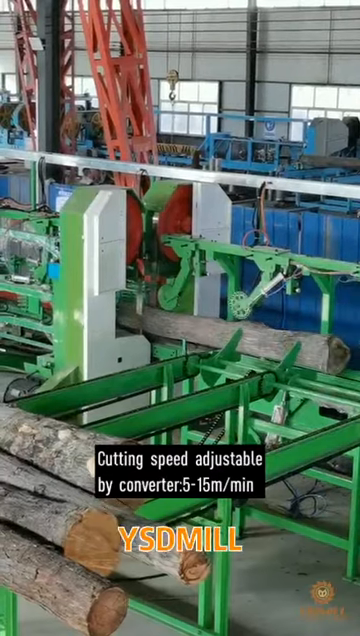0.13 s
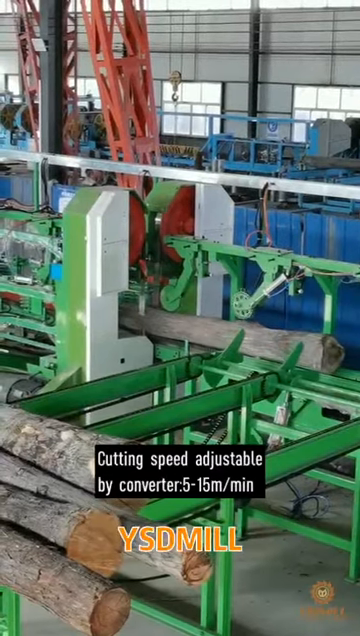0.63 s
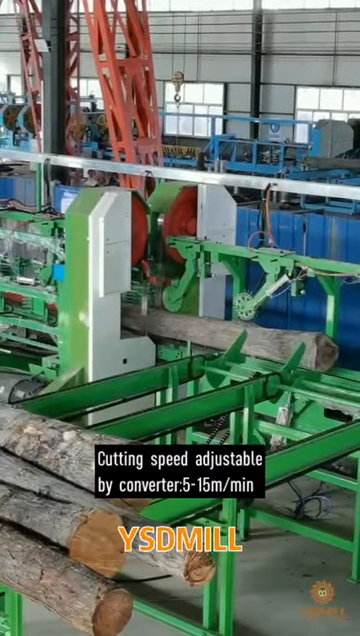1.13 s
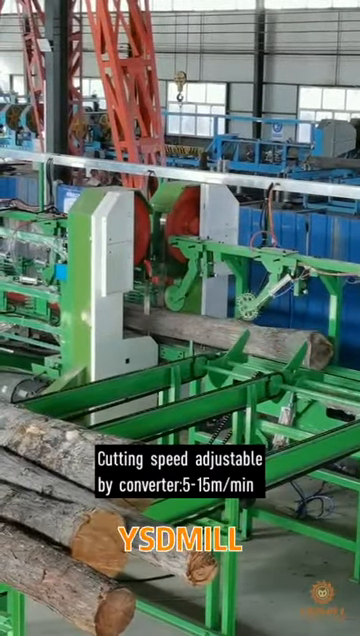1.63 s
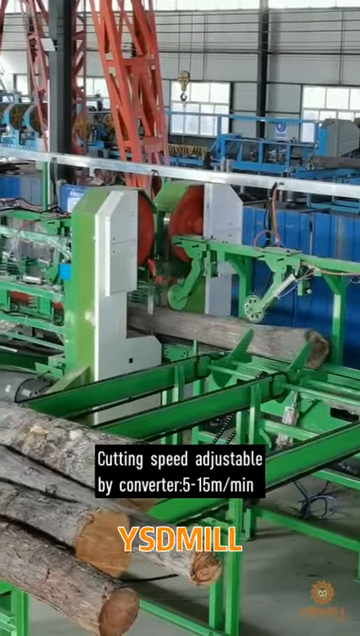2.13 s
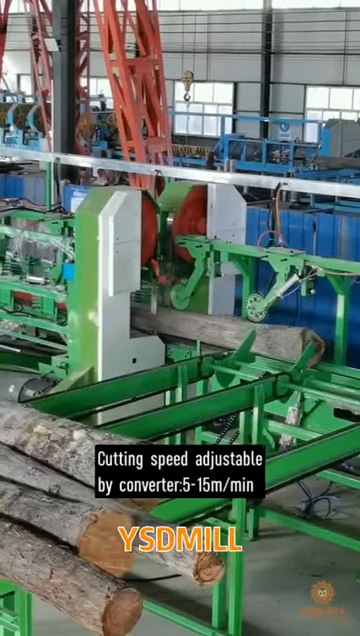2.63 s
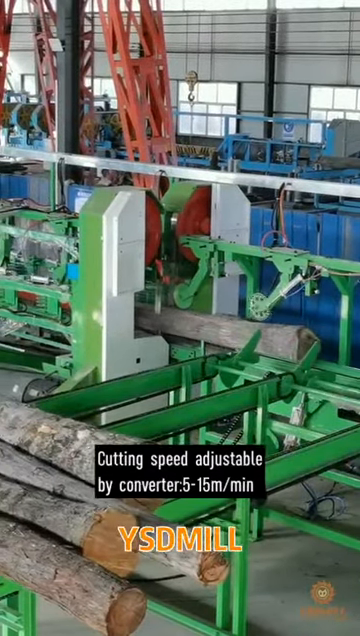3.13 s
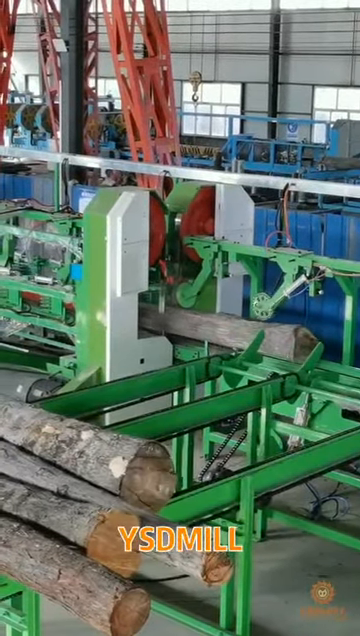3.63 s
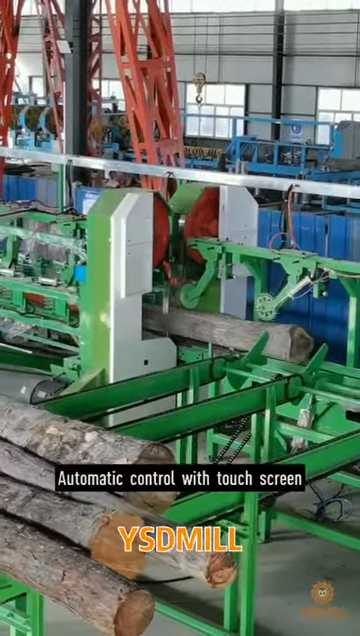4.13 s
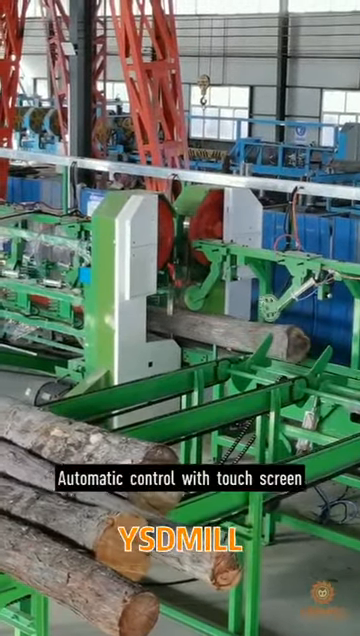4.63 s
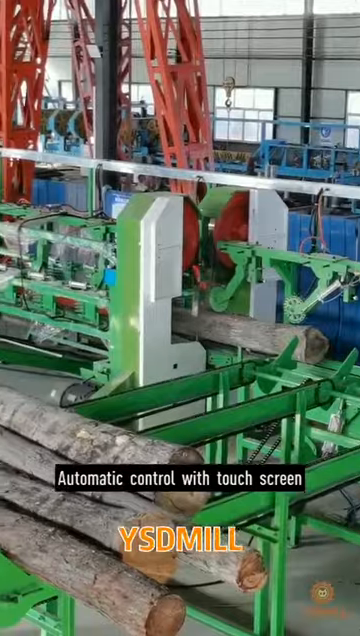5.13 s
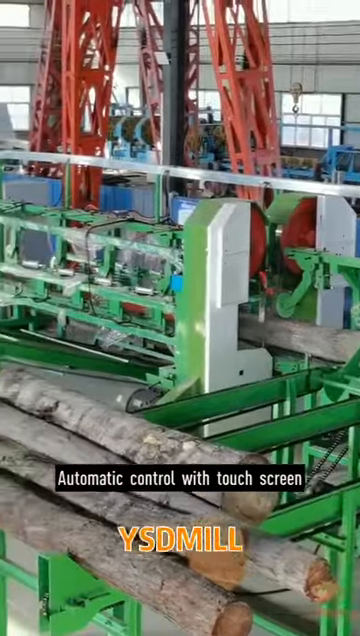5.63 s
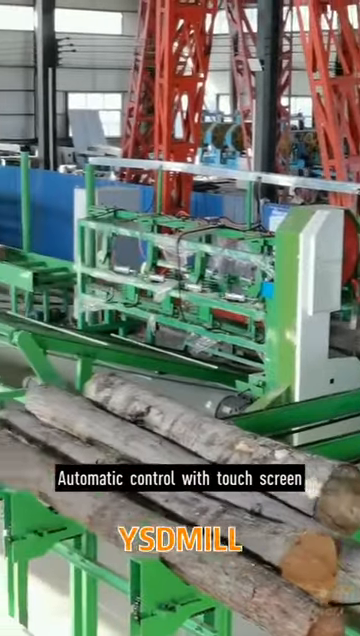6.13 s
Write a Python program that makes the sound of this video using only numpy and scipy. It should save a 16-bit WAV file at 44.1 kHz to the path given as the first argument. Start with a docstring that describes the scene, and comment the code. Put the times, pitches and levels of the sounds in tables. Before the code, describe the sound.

A steady industrial sawing noise, already running and never stopping. Two rough blade tones close in pitch beat and shimmer, with high metallic overtones buried in a dense, sizzling cutting hiss. Motors and guards drone underneath, midrange-heavy and resonant. Small surges and tiny dips ruffle the hiss, and faint tones swell briefly. The hall smears everything into diffuse, wide reverberation, picked up by a handheld stereo phone some metres away.

```python
"""In a large steel hall a twin band saw rips a log, some metres from a phone with two microphones.
Each blade sings at its own tooth rate in overtones that wander and rasp. The kerfs hiss in shaped noise
that surges and dips with the bite. Motors and frames drone as noise with narrow resonances, a few single
tones swell briefly, and the hall blends it all into a diffuse roar."""
import sys
import numpy as np
from scipy import signal
from scipy.fft import rfft, irfft, next_fast_len
from scipy.io import wavfile
from scipy.ndimage import uniform_filter1d

SR = 44100
rng = np.random.default_rng(int(sys.argv[2]) if len(sys.argv) > 2 else 0)


def volts_from_db(level):
    """Convert decibel levels to linear amplitude ratios."""
    exponent = np.asarray(level, float) / 20
    return 10 ** exponent


def transcribe(signal):
    """Save signal, clipped to [-1, 1], as a 16-bit WAV file at the path in sys.argv[1]."""
    frames = np.atleast_2d(signal).T
    limited = np.clip(frames, -1, 1)
    pcm = np.round(limited * 32767).astype(np.int16)
    wavfile.write(sys.argv[1], SR, pcm)


N = 276066
SIZE = next_fast_len(N)
HZ = np.maximum(np.arange(SIZE // 2 + 1) * SR / SIZE, 1)
TIME = np.arange(N) / SR

# Broad roar of the machinery. Each row: frequency in Hz, relative power per Hz in dB.
ROAR_SPECTRUM = [(25, -29), (45, -18), (60, -14), (130, -9.5), (300, -9.5), (480, -13), (620, -5.5),
                 (950, -5.5), (1250, -2.5), (1500, -9), (2500, -32.5), (5000, -50)]
# Where frames and guards ring. Each entry: frequency in Hz.
FRAME_HZ = [67, 103, 111, 122, 148, 180, 356, 373, 405, 570, 650, 782, 991, 1045, 1058, 1071, 1084, 1106,
            1130, 1156, 1195, 1236, 1320, 1693, 1814, 2835]
# How they ring, one row per frequency above. Each row: width in Hz, peak in dB on the scale of the roar.
FRAME_RINGS = [(4.1, 3.5), (4.3, 4.5), (8, 2), (5.5, -2), (7.4, -3), (3.5, -1.5), (5.9, -4.5), (3.4, -4),
               (4, -5.5), (12, -4), (12, 0), (26, -2.5), (5.1, -2), (8, 10.5), (10, 9), (10, 8), (12, 5.5),
               (16, 1.5), (8, 6.5), (14, 2), (30, 1.5), (14, 2.5), (14, 0), (33, 2.5), (10, 4.5), (33, 0.5)]
# Tones that swell briefly. Each row: start in seconds, length in seconds, frequency in Hz, level in dB.
TONE_SWELLS = [(1, 0.59, 405, -42.5), (1.2, 0.27, 1530, -31.5), (1.817, 0.49, 1817, -35.5),
               (4.9, 1.1, 181.7, -44), (5.68, 0.58, 121.7, -41), (5.95, 0.58, 1312, -36.5)]

# Fibres tearing in the kerf. Each row: frequency in Hz, relative power per Hz in dB.
FIBRE_SPECTRUM = [(500, -23), (1000, -7.5), (1600, -4), (2800, 0.5), (4200, -1), (5200, -3), (8000, -18)]
# Chips flying. Each row: frequency in Hz, relative power per Hz in dB.
CHIP_SPECTRUM = [(3000, -30), (4600, -2.5), (6000, 1), (9000, 0.5), (12000, 0.5), (16000, 0.5)]
# Slow course of the hiss as the log feeds through. Each row: time in seconds, level in dB.
BITE = [(0, -15.5), (.6, -15.8), (1.5, -17.5), (2.9, -17.6), (3.6, -16.5), (4.4, -17.2), (5.2, -16.5),
        (5.6, -17), (6.26, -17.5)]
# The teeth grab and the hiss surges. Each row: time of the peak in seconds, change in dB.
SURGES = [(.062, 2), (1.211, 3), (1.559, 3), (1.818, 2.5), (1.917, 3.5), (2.074, 4.5), (2.183, 3.5),
          (2.35, 3.5), (2.505, 2.5), (2.668, 2.5), (2.824, 2), (3.367, 3), (3.911, 2.5), (4.316, 3.5),
          (4.832, 1.5)]
# The hiss dips briefly. Each row: time of the low point in seconds, change in dB.
DIPS = [(.279, -3.5), (.617, -3), (1.771, -3.5), (2.71, -4.5), (3.301, -3.5), (4.002, -2), (5.476, -2)]

# Tooth rate of the near blade, sagging with the load. Each row: time in seconds, rate in Hz.
NEAR_TOOTH_RATE = [(0, 1092.5), (1, 1091), (2, 1089.5), (3.4, 1089), (4, 1087), (4.6, 1083.5), (5.3, 1081),
                   (5.8, 1078.5), (6.26, 1074.5)]
# Tooth rate of the far blade, climbing for two seconds, then sagging, with a slight rise at the end.
# Each row: time in seconds, rate in Hz.
FAR_TOOTH_RATE = [(0, 1076), (.45, 1080), (1.2, 1090.5), (2.1, 1098), (2.6, 1096.5), (3.1, 1094.5),
                  (3.7, 1092), (4.3, 1088.5), (5.2, 1086), (6.26, 1088)]
# Overtones 1-14 of the tooth rate, before the singing gain. Each row: near blade in dB, far blade in dB.
OVERTONES = [(-41, -41.5), (-52, -49), (-63, -45.5), (-44, -53), (-44.5, -37), (-44, -44), (-57, -48),
             (-41, -40), (-46, -43), (-46, -45), (-44, -46), (-49, -50), (-50, -50), (-48, -49)]
# Singing gain of the blades. Each row: time in seconds, near blade in dB, far blade in dB.
SINGING = [(0, 4, -1), (.7, 9.5, -8), (1.4, 6.5, 1.5), (2.4, 3.5, 2), (3.2, 7.5, 5.5), (4.2, 2, 7),
           (4.8, 9, 5), (5.5, -5, 2.5), (6.26, -2, 4.5)]

# Likeness of left and right in the hall noise. Each row: frequency in Hz, correlation from 0 to 1.
LIKENESS = [(60, 0.97), (130, 1), (290, 0.82), (640, 0.47), (1410, 0), (3100, 0.07), (6820, 0), (15000, 0)]
# Points at which the microphone ports colour the sound. Each entry: frequency in Hz.
PORT_HZ = [50, 400, 1200, 2500, 4350, 4700, 5150, 5450, 5900, 7000, 7700, 8250, 9000, 9520, 9720, 10000,
           11500, 13500, 14500, 15400]
# Colour of the two ports, one row per frequency above. Each row: left gain in dB, right gain in dB.
PORT_GAINS = [(-0.3, 0.5), (1, 1.5), (0.9, 2.5), (0, -1), (-1.5, -1.5), (-5, -9), (-1.5, -5), (-2, -3.5),
              (-1, -6.5), (0, -8), (0, -6), (-5.5, 6.5), (-15, 3), (-17, 1.5), (-13, 6.5), (-7, -1.5),
              (-4.5, 0), (-7, -1.5), (-1.5, -3), (-2.5, -2.5)]


def over_time(table):
    """Draws each column of a table as a curve in time."""
    seconds, *columns = np.transpose(table)
    return [np.interp(TIME, seconds, column) for column in columns]


def over_hz(table):
    """Draws each column of a table along the frequency axis, straight in log frequency."""
    hz, *columns = np.transpose(table)
    return [np.interp(np.log(HZ), np.log(hz), column) for column in columns]


def bumps(table, width_s):
    """Sums bell-shaped changes of level in dB, all falling to 1/e at width_s from the centre."""
    return sum(db * np.exp(-((TIME - centre) / width_s) ** 2) for centre, db in table)


def walk(rate):
    """Wanders at random: levels held for 1 / rate s, smoothed twice, spread near 1."""
    hold = int(SR / rate)
    steps = np.repeat(rng.standard_normal(N // hold + 1), hold)
    smooth = uniform_filter1d(uniform_filter1d(steps, hold), hold)
    return 1.25 * smooth[:N]


def fading(rate, steady):
    """Many hall paths add up: a tone's size and phase wander, differently at each port."""
    paths = [steady + walk(rate) + 1j * walk(rate) for _ in range(2)]
    return np.array(paths) / np.sqrt(steady ** 2 + 2)


def diffuse(power, lo_hz, hi_hz, flicker_db, rate):
    """Hall noise of rms 1, alike in both ports in the bass; each half-octave band flickers alone."""
    alike = np.clip(over_hz(LIKENESS)[0], 0, 1)
    noise = rfft(rng.standard_normal((2, SIZE)))
    mid, side = noise * np.sqrt(power * [1 + alike, 1 - alike])
    stereo = np.array([mid + side, mid - side])
    out = 0
    for octave in np.arange(np.log2(lo_hz), np.log2(hi_hz), 0.5):
        band = np.clip(1 - 2 * abs(np.log2(HZ) - octave), 0, 1)  # overlapping triangles
        flicker = volts_from_db(flicker_db * walk(rate))
        out = out + flicker * irfft(band * stereo, SIZE)[:, :N]
    return out / np.sqrt(np.mean(out ** 2))


def drone():
    """Motors and frames: broad noise with the frame resonances standing on it as narrow peaks."""
    level_db = -23.5  # before the bass change
    bass_db, turn_s, turn_bass_db_per_s = -1.5, 5.3, 4.5  # the bass grows once the phone turns
    rings = 0
    for hz, (width, db) in zip(FRAME_HZ, FRAME_RINGS):
        rings = rings + volts_from_db(2 * db) / (1 + (2 * (HZ - hz) / width) ** 2) ** 2
    power = volts_from_db(2 * over_hz(ROAR_SPECTRUM)[0]) + rings
    roar = diffuse(power, 26, 7000, flicker_db=0.23, rate=4.95)
    low_pass = signal.butter(2, 220, fs=SR, output="sos")
    bass = signal.sosfiltfilt(low_pass, roar)
    bass_gain = volts_from_db(bass_db + turn_bass_db_per_s * np.maximum(TIME - turn_s, 0))
    return volts_from_db(level_db) * (roar + (bass_gain - 1) * bass)


def swells():
    """Single tones that rise, hold and die away under a rounded arch, wavering a little in the hall."""
    out = np.zeros((2, N))
    for start, length, hz, db in TONE_SWELLS:
        progress = np.clip((TIME - start) / length, 0, 1)
        arch = np.sqrt(np.clip(np.sin(np.pi * progress), 0, 1))
        tone = (fading(6.5, steady=2.3) * np.exp(2j * np.pi * hz * TIME)).real
        out += np.sqrt(2) * volts_from_db(db) * arch * tone
    return out


def kerf():
    """Wood fibres tear with a coarse hiss and chips fly with a fine one; both follow the bite."""
    judder_db, judders_per_s = 0.64, 22  # quick chance in the bite
    coarse_db = -3.5  # coarse hiss against the fine
    bite_db = over_time(BITE)[0] + judder_db * walk(judders_per_s)
    bite_db = bite_db + bumps(SURGES, width_s=0.047) + bumps(DIPS, width_s=0.02)
    fine = diffuse(volts_from_db(2 * over_hz(CHIP_SPECTRUM)[0]), 2830, 22000, flicker_db=0.68, rate=18)
    coarse = diffuse(volts_from_db(2 * over_hz(FIBRE_SPECTRUM)[0]), 362, 11000, flicker_db=0.86, rate=12)
    return volts_from_db(bite_db) * (fine + volts_from_db(coarse_db) * coarse)


def blade(tooth_rate, overtones_db, sing_db, wobble_hz, fade_rate, rasp):
    """Teeth strike in step; wobbling speed blurs the high overtones, uneven teeth rasp around each."""
    speed_hz = over_time(tooth_rate)[0] + wobble_hz * walk(30)
    phase = 2 * np.pi * np.cumsum(speed_hz) / SR
    out = 0
    for k, db in enumerate(overtones_db, 1):
        waver = fading(fade_rate, steady=0.47)
        rough = rasp * fading(22 * k + 20, steady=0)  # quicker on higher overtones
        out = out + volts_from_db(db) * ((waver + rough) * np.exp(1j * k * phase)).real
    return np.sqrt(2) * volts_from_db(sing_db) * out


def scene():
    """Lays the machinery, the swelling tones and the hiss under the two blades."""
    near_db, far_db = over_time(SINGING)
    near_tones_db, far_tones_db = np.transpose(OVERTONES)
    near = blade(NEAR_TOOTH_RATE, near_tones_db, near_db, wobble_hz=1.554, fade_rate=12, rasp=0.85)
    far = blade(FAR_TOOTH_RATE, far_tones_db, far_db, wobble_hz=1.125, fade_rate=9, rasp=0.61)
    return drone() + swells() + kerf() + near + far


def top_cut(x):
    """Nothing passes above the cut-off."""
    return signal.sosfilt(signal.butter(12, 16270, fs=SR, output="sos"), x)


def record(dry):
    """Each microphone port colours the sound its own way, and the top is cut."""
    top_hz = 15740
    port_gain = volts_from_db(np.array(over_hz(np.c_[PORT_HZ, PORT_GAINS])))
    colour = port_gain * (HZ < top_hz)
    heard = irfft(rfft(dry, SIZE) * colour, SIZE)[:, :N]
    mix = np.clip(heard, -1, 1)
    return top_cut(mix)


dry = scene()
out = record(dry)
transcribe(out)
```